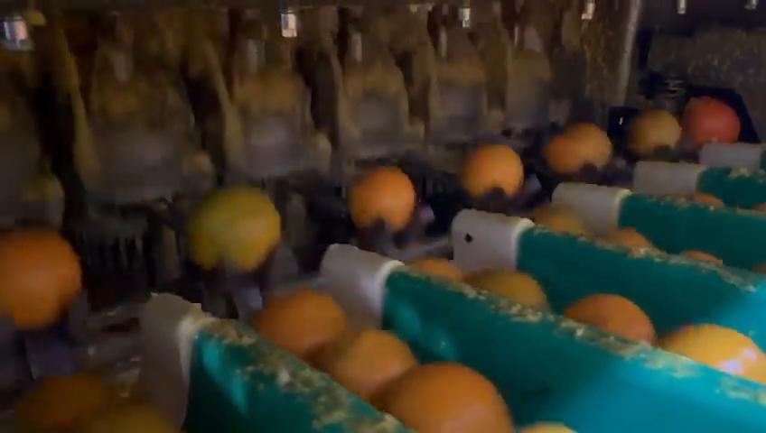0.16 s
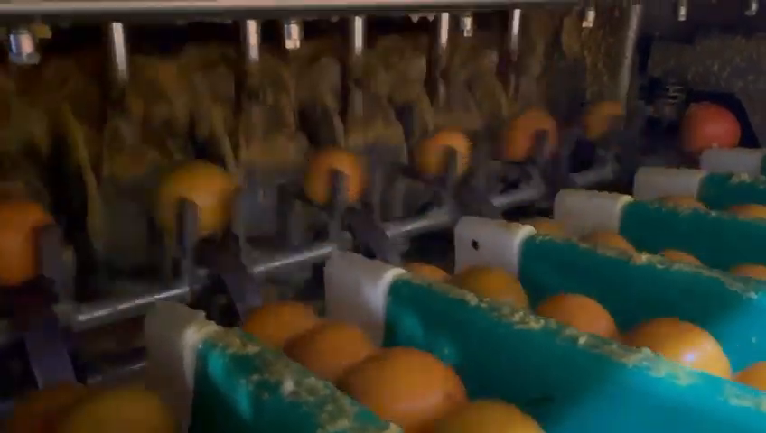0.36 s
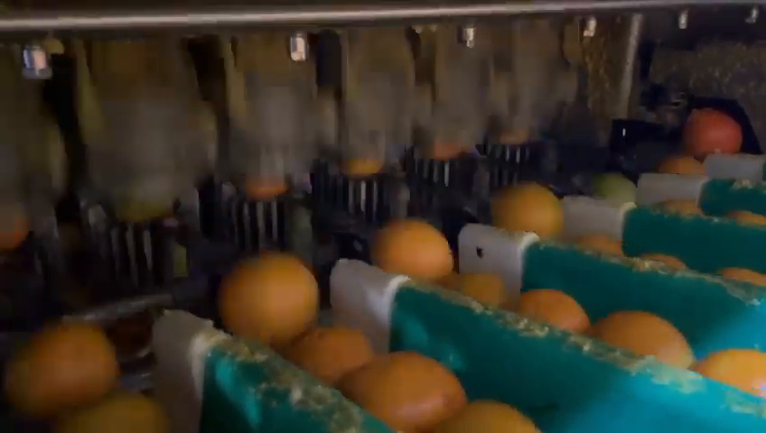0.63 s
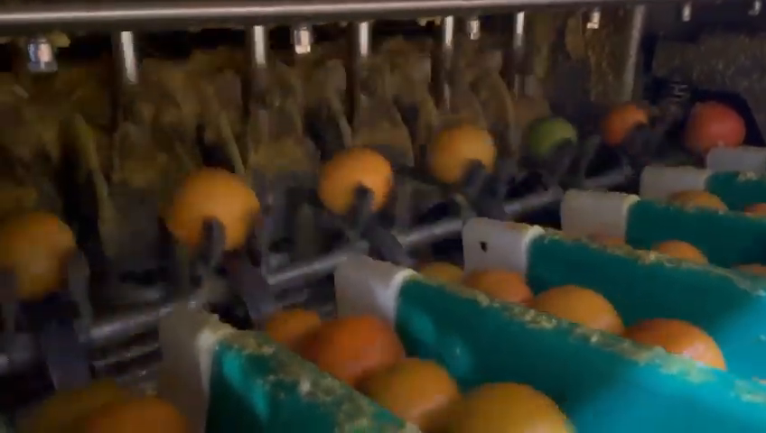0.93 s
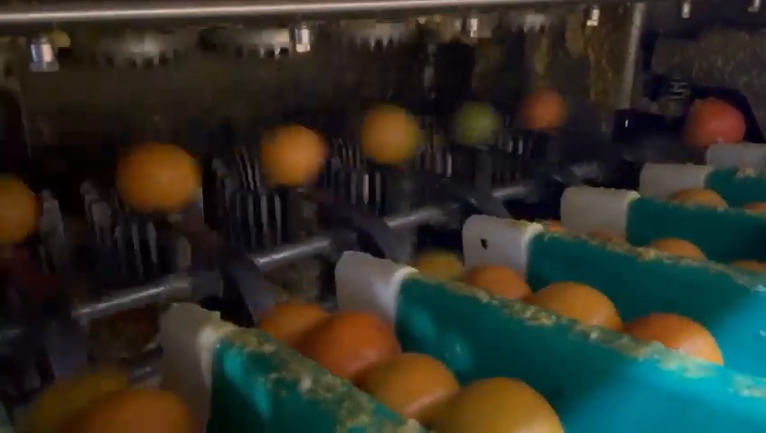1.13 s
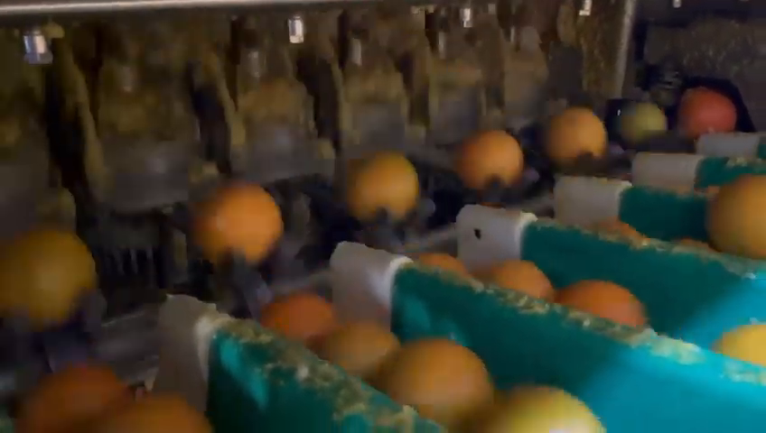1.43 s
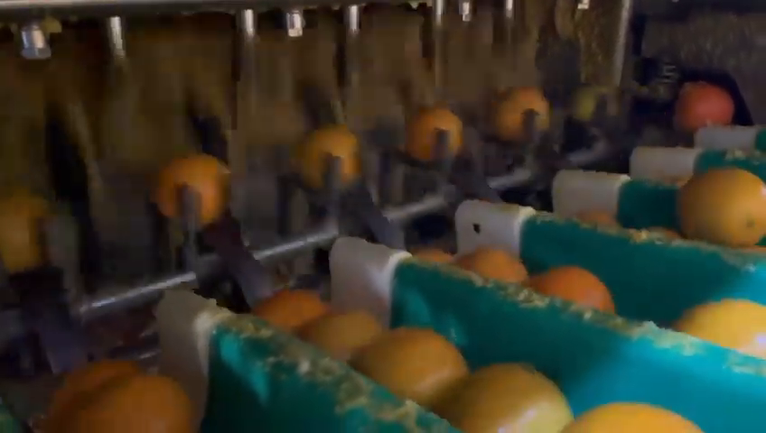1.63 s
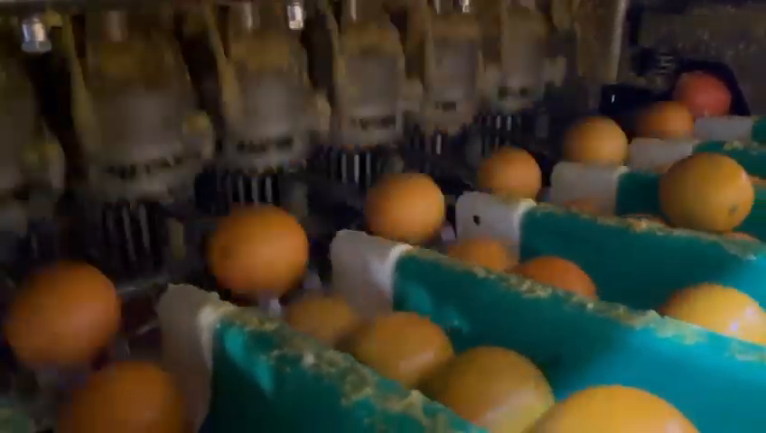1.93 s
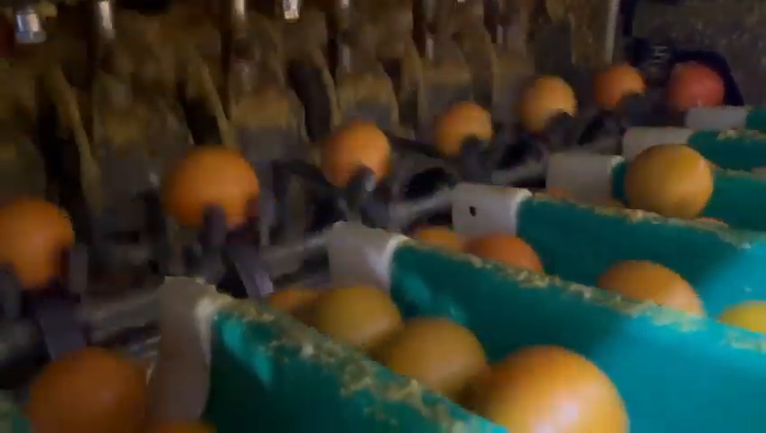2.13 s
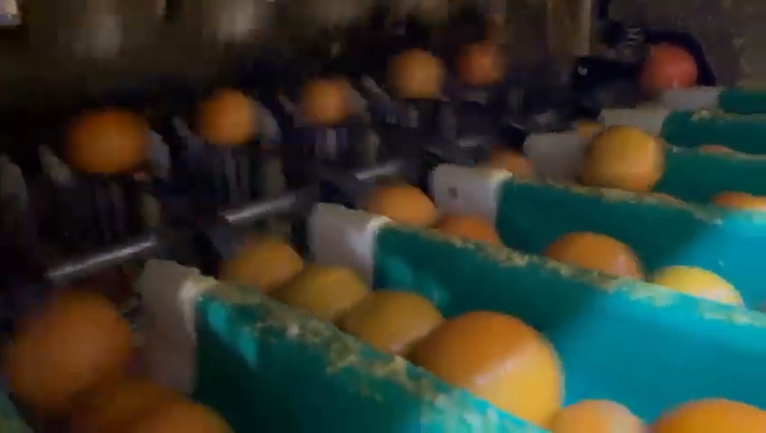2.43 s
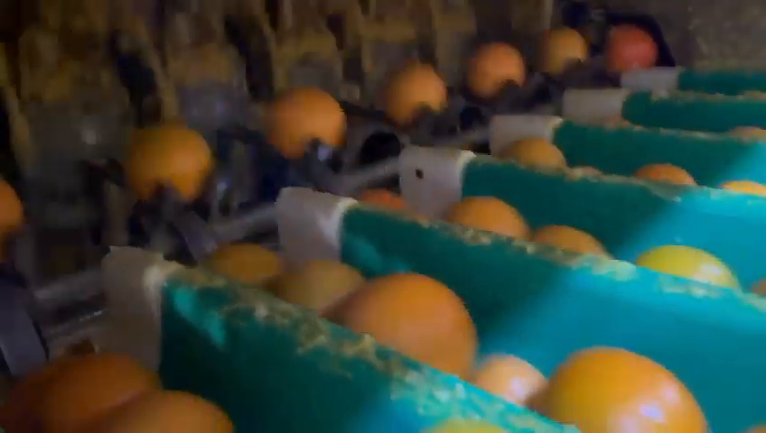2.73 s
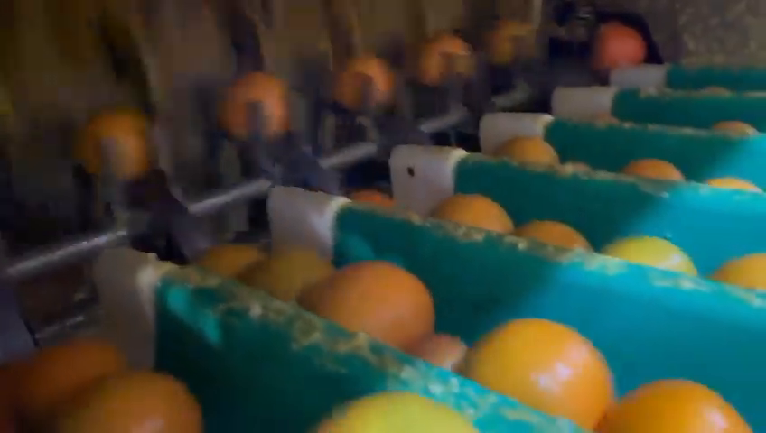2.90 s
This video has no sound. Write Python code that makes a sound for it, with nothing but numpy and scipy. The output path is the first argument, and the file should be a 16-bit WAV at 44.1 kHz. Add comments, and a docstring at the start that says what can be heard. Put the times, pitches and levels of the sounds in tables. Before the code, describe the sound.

Close stereo view of a citrus extractor in a reverberant factory, about three strokes every two seconds, each a spray, wet crunch and boom, then a low rattle; metal clacks, brief squeaks, peel snaps and fruit thuds between.

```python
"""An industrial citrus extractor crunches fruit close by in a hard-walled factory, about 96 strokes a minute.
On each stroke juice sprays, the peel bursts in a wet crunch and the steel frame booms; then the feeder rattles
back. Steel fingers clack and squeak, the frame knocks, peel snaps and fruit thuds, over the drone of the drive.
Crunch, spray and rattle are coloured bursts of tiny cracks; clacks, knocks and thuds are fading sine waves;
the boom is noise through resonances, and the drive is coloured noise with steady tones."""
import sys
import numpy as np
from scipy import signal
from scipy.fft import rfft, irfft
from scipy.io import wavfile

SR = 44100
rng = np.random.default_rng(int(sys.argv[2]) if len(sys.argv) > 2 else 0)


def master_out(mix):
    """Clip the mix to full scale and print it as 16-bit PCM to the path in sys.argv[1]."""
    frames = np.transpose(np.atleast_2d(mix))
    ceiling = np.clip(frames, -1, 1)
    pcm = np.round(ceiling * 32767).astype(np.int16)
    wavfile.write(sys.argv[1], SR, pcm)


N = 134946

# strokes of the cups: (height of the crunch t/s, crunch level/dB, frame boom level/dB, crunch rise/s,
# return rattle level/dB)
CUP_STROKES = [(0.279, 1.5, 1.5, 0.016, -2), (0.914, -1.5, -3, 0.012, -0.5), (1.533, 0, 2.5, 0.022, 3.5),
               (2.164, -1, 2, 0.024, -2.5), (2.78, 2, -4, 0.01, 2.5)]
# resonances of the steel frame: (f/Hz, width/Hz, level/dB)
FRAME_MODES = [(212, 20, 1), (316, 28, -.5), (446, 26, -3), (553, 33, -6.5), (624, 33, -9.5),
               (775, 50, -10.5), (1050, 130, -17), (1295, 15, -16)]
GRAIN_SPREAD_DB = 3.5  # unevenness of the little cracks and droplets


def undb(db):
    """Turn decibels into a gain."""
    return 10 ** (np.asarray(db) / 20)


def unit(x):
    """Scale to an rms of 1."""
    return x / np.sqrt(np.mean(np.abs(x) ** 2))


def times():
    """The time of every sample, in seconds."""
    return np.arange(N) / SR


def bins():
    """The frequency of every spectral bin in Hz, at least 1."""
    return np.maximum(np.arange(N // 2 + 1) * SR / N, 1)


def across(points):
    """Join (Hz, value) points by straight lines on a log-frequency axis."""
    hz, value = np.array(points).T
    return np.interp(np.log(bins()), np.log(hz), value)


def colour(x, points):
    """Give a sound a spectrum, falling away below its first point; white noise keeps its power."""
    low_cut = np.minimum(bins() / points[0][0], 1) ** 2
    gain = undb(across(points)) * low_cut
    return irfft(rfft(x) * unit(gain), N)


def noise():
    """Two unrelated white noises: the direct and the diffuse part of a sound."""
    return rng.standard_normal((2, N))


def walk(rate):
    """Random drift: about `rate` new values a second, joined by straight lines."""
    step = int(SR / rate)
    count = N // step + 2
    return np.interp(np.arange(N) / step, np.arange(count), rng.standard_normal(count))


def grains(per_s, spread_db):
    """Dense little cracks of uneven size: bits of noise that die away within milliseconds."""
    size = undb(spread_db * np.clip(rng.standard_normal(N), -2, 2))
    hits = (rng.random(N) < per_s / SR) * size
    # the power of each crack decays with a time constant of 1 ms
    power = signal.lfilter([1], [1, -np.exp(-1 / (.001 * SR))], hits ** 2)
    return unit(noise() * np.sqrt(power + 1e-12))


def swell(at, rise, fall):
    """An envelope with a rounded rise to a peak and an exponential fall."""
    t = times() - at
    return np.exp(-.5 * (np.minimum(t, 0) / rise) ** 2 - np.maximum(t, 0) / fall)


def fade(t, t60):
    """Exponential decay that loses 60 dB in t60 seconds."""
    return np.exp(-np.log(1000) * t / t60)


def blow(at, rise, t60):
    """The envelope of a blow: quick rise, then decay."""
    t = np.maximum(times() - at, 0)
    return (1 - np.exp(-t / rise)) * fade(t, t60)


def ring(at, modes, rise, tilt_db, scatter_db, detune):
    """Struck modes as fading sine waves, a little different on every blow; tilt is in dB per octave."""
    out = np.zeros((2, N))
    start = max(int(at * SR), 0)
    t = np.arange(min(SR // 2, N - start)) / SR
    centre = np.mean([mode[0] for mode in modes])
    chance = rng.standard_normal((len(modes), 2))
    for (hz, db, t60), (level_chance, pitch_chance) in zip(modes, chance):
        gain = undb(db + tilt_db * np.log2(hz / centre) + scatter_db * level_chance)
        phase = 2 * np.pi * (hz * (1 + detune * pitch_chance) * t + rng.random((2, 1)))
        out[:, start:start + len(t)] += gain * np.sin(phase) * fade(t, t60) * (1 - np.exp(-t / rise))
    return out


def droplets():
    """Droplets and bubbles squeezed from the peel: tiny wet pings, each gliding up as it dies."""
    centre_hz, spread_octaves, per_s = 2150, .62, 700
    t60, glide_per_s = .028, 3
    out = np.zeros((2, N + SR))
    t = np.arange(int(t60 * SR)) / SR
    count = int(per_s * N / SR)
    starts = rng.integers(0, N, count)
    for start, (pitch, size, lag) in zip(starts, rng.standard_normal((count, 3))):
        hz = centre_hz * 2 ** (spread_octaves * pitch)
        phase = 2 * np.pi * hz * t * (1 + glide_per_s * t / 2)
        ping = np.sin([phase, phase + np.pi * lag]) * fade(t, t60)
        out[:, start:start + len(t)] += undb(GRAIN_SPREAD_DB * np.clip(size, -1, 1)) * ping
    return unit(out[:, :N])


def cups():
    """The cups burst the peel: an uneven crunch of dense cracks, wet with droplets."""
    # spectrum of the crunch: (f/Hz, level/dB per Hz)
    crunch_colour = [(260, -7), (620, -1), (1250, -5), (2050, -10), (3350, -11), (5100, -18.5), (7500, -16),
                     (9400, -21.5), (11400, -23)]
    hold, fall = .014, .026  # s
    crush = 0
    for at, db, _, rise, _ in CUP_STROKES:
        first = swell(at - hold, rise, fall)
        second = swell(at + hold, hold, fall) / 2
        crush = crush + undb(db) * (first + second)
    crush = crush * undb(1.2 * walk(130))  # flutter
    crunch = undb(-21.5) * colour(crush * grains(2300, GRAIN_SPREAD_DB), crunch_colour)
    squelch = undb(-29) * crush * droplets()
    return crunch + squelch


def juice_spray():
    """Juice sprays as the cups close: a fluttering rush of very dense little cracks."""
    # spectrum of the spray: (f/Hz, level/dB per Hz)
    spray_colour = [(1500, -4), (3200, 0), (5100, -1), (7500, 2), (9400, -2.5), (11400, -5)]
    lead, rise, hold, fall = .118, .022, .14, .069  # s; hold counts from the start of the spray
    flow = 0
    for at, *_ in CUP_STROKES:
        t = times() - at + lead
        flow = flow + np.clip(t / rise, 0, 1) * np.exp(-np.maximum(t - hold, 0) / fall)
    flow = flow * undb(2 * walk(45))  # flutter
    return undb(-35) * colour(flow * grains(2200, GRAIN_SPREAD_DB), spray_colour)


def return_effort():
    """How hard the feeder shakes as it swings back after each stroke."""
    lag, rise, fall = .21, .066, .07  # s
    return sum(undb(db) * swell(at + lag, rise, fall) for at, _, _, _, db in CUP_STROKES)


def feeder_rattle():
    """The feeder rattles back: low-pitched cracks that follow its shaking."""
    # spectrum of the rattle: (f/Hz, level/dB per Hz)
    rattle_colour = [(160, -6), (330, 5.5), (720, 0), (1250, -7.5), (2250, -24), (4600, -27.5), (7400, -42),
                     (11200, -41)]
    return undb(-19) * colour(return_effort() * grains(710, GRAIN_SPREAD_DB), rattle_colour)


def frame():
    """The steel frame booms under each stroke and shudders in between: noise through its resonances."""
    lag, rise, fall = .042, .066, .033  # s
    push = sum(undb(db) * swell(at + lag, rise, fall) for at, _, db, _, _ in CUP_STROKES)
    push = push + undb(-10.5) * return_effort() + undb(-6.5)  # the last part never stops
    f = bins()
    body = 0
    for k, (hz, width, db) in enumerate(FRAME_MODES):
        sign = (-1) ** k  # neighbouring resonances push opposite ways
        body = body + sign * undb(db) / (1 + 1j * (f / hz - hz / f) * hz / width)
    body = body / (1 + (f / 1700) ** 4)  # dull the treble
    return undb(-18.5) * irfft(rfft(push * noise()) * unit(body), N)


def fingers():
    """Steel fingers clack and bounce once: a rough crack, and a short ring unless fruit damps them."""
    # clacks: (t/s, level/dB, brightness/dB per octave, ring against crack level/dB)
    clacks = [(.003, -5, 6, -11), (.142, -4, 7, -12), (.409, -7, 5, -8), (.995, -16, 3, -3),
              (1.035, -5, 1, -7), (1.658, 0, -2, -.5), (2.281, -10.5, -1, -.5), (2.997, -3, 2, -9)]
    # modes of the fingers: (f/Hz, level/dB, t60/s)
    finger_modes = [(1305, -7, .07), (2010, -9, .05), (2220, -1.5, .07), (2330, -7, .05), (3380, -4, .045),
                    (3485, -1, .06), (4090, -2, .09), (4520, -6, .055), (4700, -3.5, .05), (5250, -10, .06),
                    (5460, -8, .06), (5890, -14, .07)]
    # spectrum of the crack: (f/Hz, level/dB per Hz)
    crack_colour = [(420, -38), (1250, 10), (2250, 8), (4150, 7.5), (6100, 2), (7900, -5), (11200, -9.5)]
    rise = .002  # s
    rings = cracks = 0
    for at, db, tilt, ring_db in clacks:
        for lag, contact_db in [(0, 0), (.007, -3)]:  # first contact, then bounce (s, dB)
            struck = ring(at + lag, finger_modes, rise, tilt, scatter_db=-1.5, detune=.0033)
            rings = rings + undb(db + ring_db + contact_db) * struck
        cracks = cracks + undb(db) * blow(at, rise, t60=.1)
    return undb(-18.5) * (rings + colour(cracks * noise(), crack_colour))


def squeaks():
    """Steel rubbing on steel sings briefly on one note, rough because pitch and level wander."""
    # squeaks: (loudest moment t/s, pitch f/Hz, level/dB, rise/s, fall/s)
    rubs = [(.375, 3485, -40.5, .045, .04), (.76, 1600, -45, .15, .06), (1., 3470, -34.5, .007, .04),
            (1.045, 3495, -26, .005, .024), (2.301, 3480, -36.5, .012, .013)]
    wander_per_s = 220
    out = 0
    for at, hz, db, rise, fall in rubs:
        phase = 2 * np.pi * (hz * times() + rng.random((2, 1))) + .7 * walk(wander_per_s)
        level = undb(db + 2.8 * walk(wander_per_s)) * swell(at, rise, fall)
        out = out + level * np.sqrt(2) * np.sin(phase)
    return out


def peel_snaps():
    """Peel snaps wetly: short blows of coloured noise."""
    # snaps: (t/s, level/dB)
    snap_times = [(0.042, -1.5), (.34, 2), (.458, 4.5), (0.49, -4), (1.083, 4), (1.187, -1), (1.285, 2),
                  (1.685, 6), (1.716, 3.5), (1.749, 5.5), (1.767, -12), (1.82, -5), (1.848, 3), (1.881, -2),
                  (2.331, 5.5), (2.403, -2.5), (2.471, -5), (2.838, 2), (2.907, 0.5), (2.934, 6),
                  (2.966, 2), (3.027, -3)]
    # spectrum of a snap: (f/Hz, level/dB per Hz)
    snap_colour = [(1250, 12), (3100, -0.5), (4750, 6.5), (6100, 3), (7400, 1.5), (11200, -7.5)]
    snaps = sum(undb(db) * blow(at, rise=.0034, t60=.11) for at, db in snap_times)
    return undb(-28.5) * colour(snaps * noise(), snap_colour)


def fruit_thuds():
    """Whole fruit drops into the cups and chutes and sets off their low modes."""
    # thuds: (t/s, level/dB, hardness/dB per octave)
    drops = [(.225, -1, 9), (.395, -1.5, 6), (.448, .5, -5), (.55, 0, 9), (.67, -2, -4), (.875, -2.5, 5),
             (.935, -2.5, -1), (1.028, .5, 6), (1.08, -1, -5), (1.195, -3.5, -2), (1.345, -4, -6),
             (1.64, 1, 8), (1.728, -.5, 7), (1.81, -.5, 9), (1.89, -1, 9), (2.025, 0, 0), (2.275, 1, 8),
             (2.385, -2.5, 9), (2.62, -3, -6), (2.888, 1.5, 8), (2.99, 1, 5)]
    # modes of the chutes: (f/Hz, level/dB, t60/s)
    chute_modes = [(53, -5.5, .27), (80, -6, .16), (101, 0, .22)]
    thuds = 0
    for at, db, tilt in drops:
        thuds = thuds + undb(db) * ring(at, chute_modes, .04, tilt, scatter_db=-1.5, detune=.042)
    return undb(-7.3) * thuds


def knocks():
    """The mechanism clunks against the frame; each spot favours other resonances."""
    # heavy knocks: (t/s, level/dB, strongest ringing f/Hz)
    clunks = [(.317, 3, 215), (.411, -1, 320), (.478, -5, 560), (.885, -2, 600), (.955, -2, 300),
              (1.537, 2, 540), (1.568, 0, 520), (1.68, -2, 640), (1.832, -5, 500), (2.188, -1.5, 205),
              (2.755, -3, 470), (2.793, -.5, 530), (2.972, -5, 640)]
    focus_db, t60 = 14, .15  # focus: loss an octave away from the favoured pitch; t60 in s
    out = 0
    for at, db, centre in clunks:
        levels = np.array([level - focus_db * np.log2(hz / centre) ** 2 for hz, _, level in FRAME_MODES])
        levels = levels - levels.max()
        modes = [(hz, level, t60) for (hz, _, _), level in zip(FRAME_MODES, levels)]
        out = out + undb(-9 + db) * ring(at, modes, rise=.012, tilt_db=3, scatter_db=1, detune=.026)
    return out


def drive():
    """The drive rumbles and chatters as wavering noise and hums in tones, under a thin wet hiss."""
    # spectrum of the drone: (f/Hz, level/dB per Hz)
    drone_colour = [(24, -68), (40, -9.5), (107, -8), (134, -11), (242, -11), (320, -7.5), (540, -11.5),
                    (787, -16.5), (958, -21.5), (1020, -21.5), (2000, -33.5), (2600, -100), (4400, -120)]
    # steady tones of the drive: (f/Hz, level/dB)
    hum_tones = [(49.8, -32), (102.3, -36), (1294, -44), (1949, -57), (2220, -58), (3482, -59)]
    # spectrum of the hiss: (f/Hz, level/dB per Hz)
    hiss_colour = [(1250, -1), (2050, -.5), (3300, -.5), (5100, -11), (7500, -10), (9400, -17),
                   (11200, -20)]
    drone_db = -19 + .4 * walk(8) + 1.08 * walk(85)  # slow waver and fast chatter
    drone = undb(drone_db) * colour(noise(), drone_colour)
    hum = 0
    for hz, db in hum_tones:
        phase = 2 * np.pi * (hz * times() + rng.random((2, 1))) + .58 * walk(20)  # drift in radians
        hum = hum + undb(db) * np.sqrt(2) * np.sin(phase)
    hiss = undb(-38.5 + .23 * walk(31.1)) * colour(grains(5200, GRAIN_SPREAD_DB), hiss_colour)
    return drone + hum + hiss


def hall(x):
    """Add a short dense echo from the housing and the factory walls: a tail of fading noise."""
    tail = noise() * blow(.0025, rise=.0019, t60=.38)
    tail = tail / np.sqrt(np.sum(tail ** 2) / 2)
    return x + undb(-8) * signal.fftconvolve(x, tail, axes=1)[:, :N]


def ports(x):
    """Direct and diffuse sound reach two microphone ports with differing level and phase."""
    # share of diffuse sound: (f/Hz, share of power)
    diffuse_share = [(50, .03), (200, .055), (350, .15), (600, .32), (1200, .22), (2200, .065), (3400, .13),
                     (5000, .06), (7000, .002), (8500, .002), (11000, .012)]
    # level difference: (f/Hz, left minus right level/dB)
    balance = [(50, -4.5), (90, -.7), (300, -.6), (550, .6), (780, 4), (1300, 3), (2200, .6), (3400, 1.5),
               (5500, .8), (6900, 0), (11000, 0)]
    # phase difference: (f/Hz, lead of the left port/rad)
    phase_lead = [(200, 0), (340, -.15), (600, .5), (950, -.65), (1720, -.95), (2150, -.1), (3000, .7),
                  (3450, .85), (4130, 0), (5680, .1), (6150, -.7), (6800, -3.14), (8600, -3.14),
                  (9600, -5.9), (11600, -6.3)]
    direct, diffuse = rfft(x)
    share = np.clip(across(diffuse_share), 0, .5)
    sides = np.array([[1], [-1]])  # left, right
    both = np.sqrt(1 - share) * direct + sides * np.sqrt(share) * diffuse
    level = undb(sides * across(balance) / 2)
    turn = np.exp(.5j * sides * across(phase_lead))
    return irfft(both * level * turn, N)


def scene():
    """The whole machine in its hall; the frame, its knocks and the drive get no added echo."""
    stroke = cups() + juice_spray() + feeder_rattle()
    echoing = stroke + fingers() + squeaks() + peel_snaps() + fruit_thuds()
    return ports(hall(echoing) + frame() + knocks() + drive())


def record(dry):
    """Round the highest peaks softly, then cut the treble above 11350 Hz steeply."""
    rounded = 1.6 * np.tanh(dry / 1.6)
    top_cut = signal.ellip(10, .2, 80, 11350, fs=SR, output="sos")
    return signal.sosfilt(top_cut, rounded)


dry = scene()
out = record(dry)
master_out(out)
```